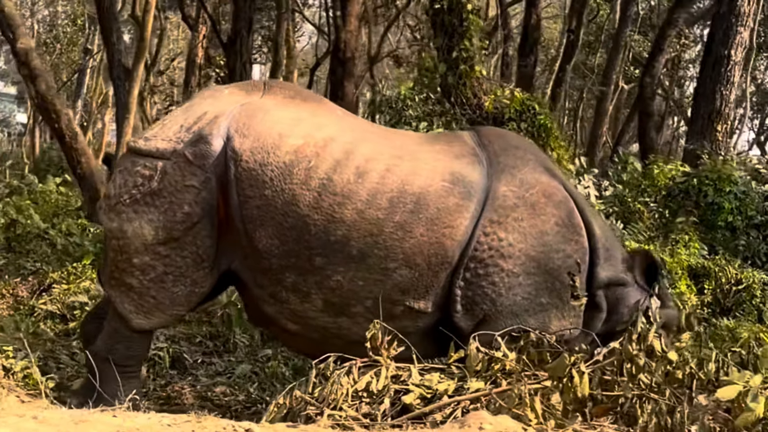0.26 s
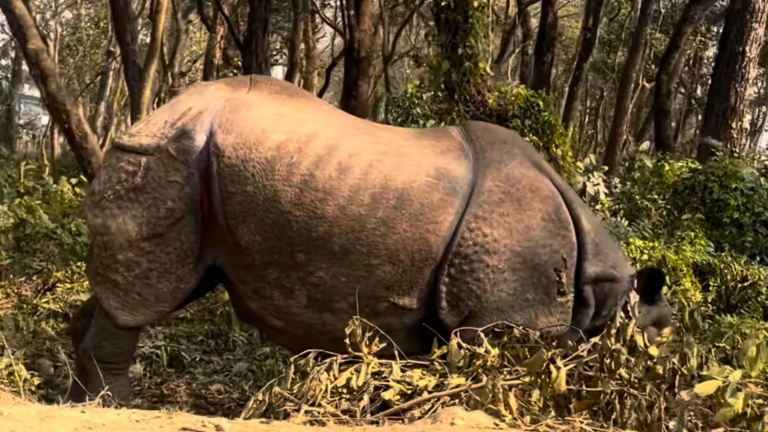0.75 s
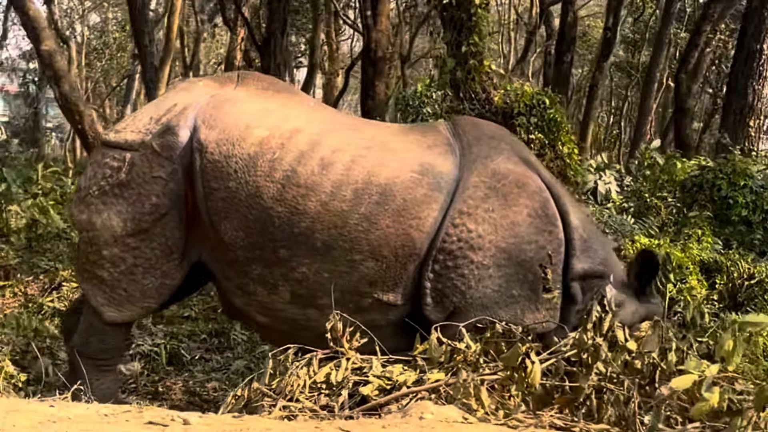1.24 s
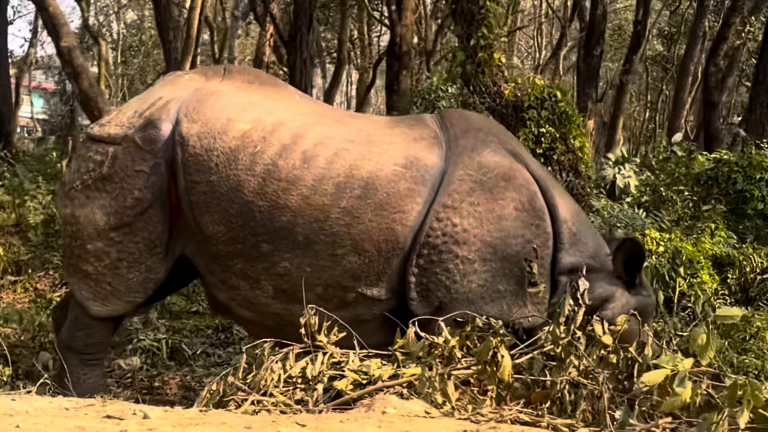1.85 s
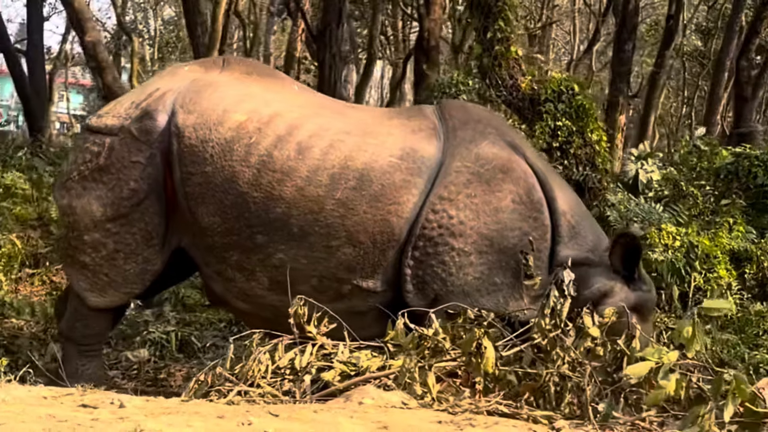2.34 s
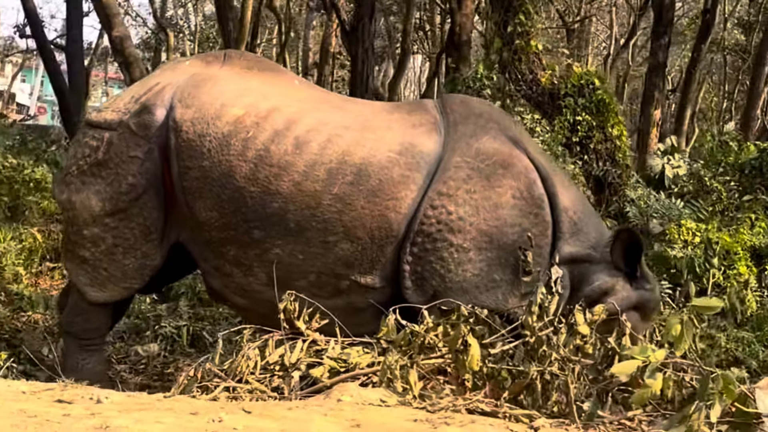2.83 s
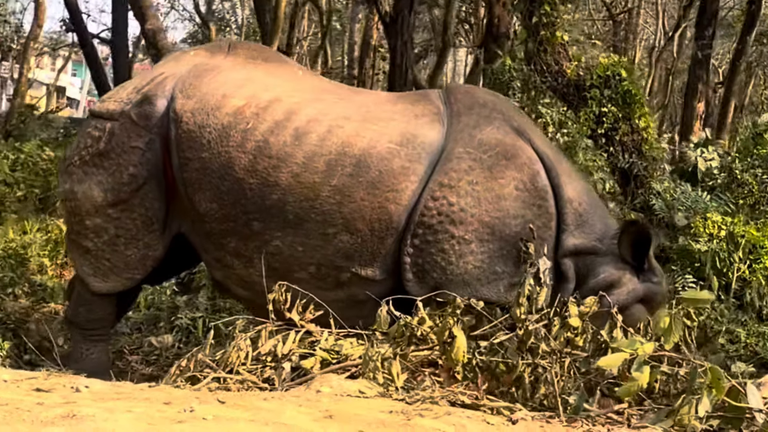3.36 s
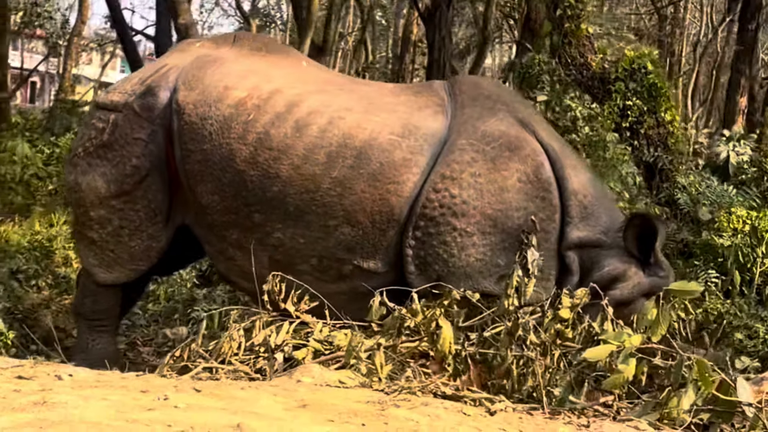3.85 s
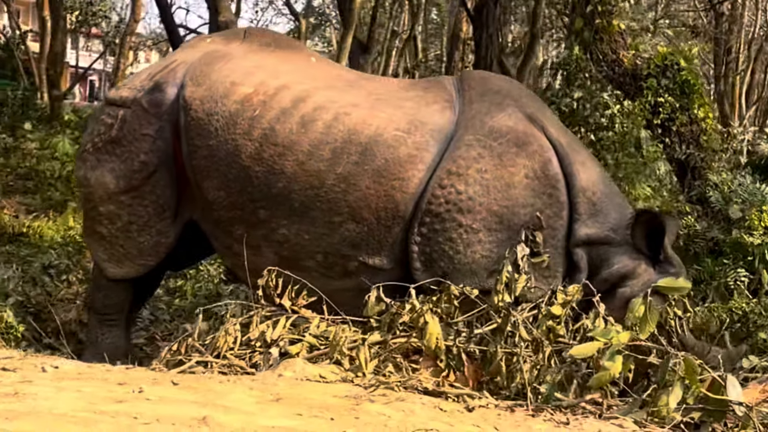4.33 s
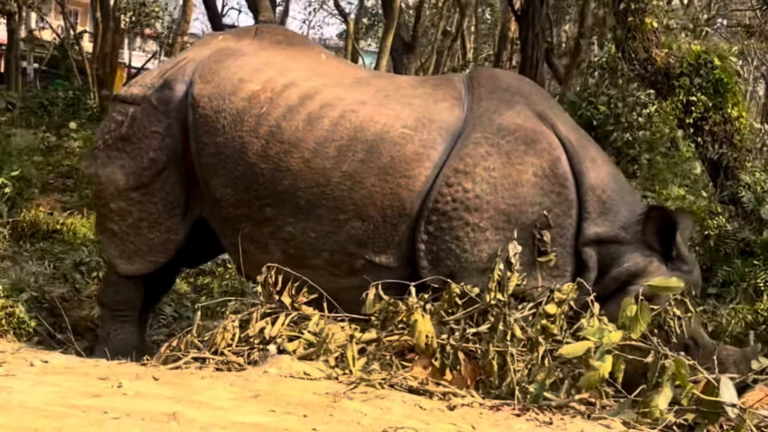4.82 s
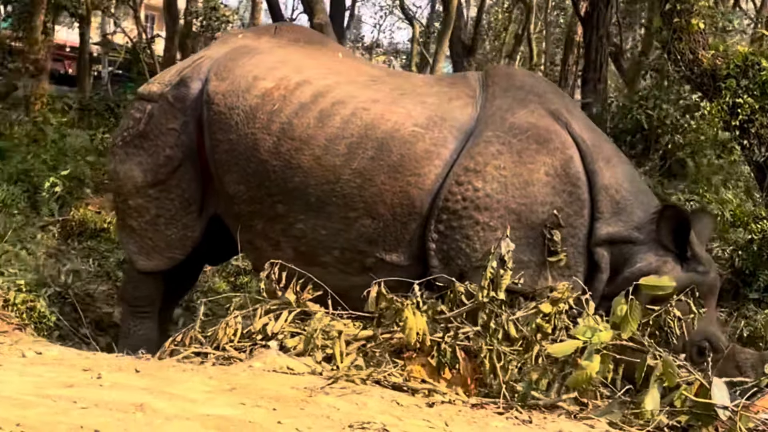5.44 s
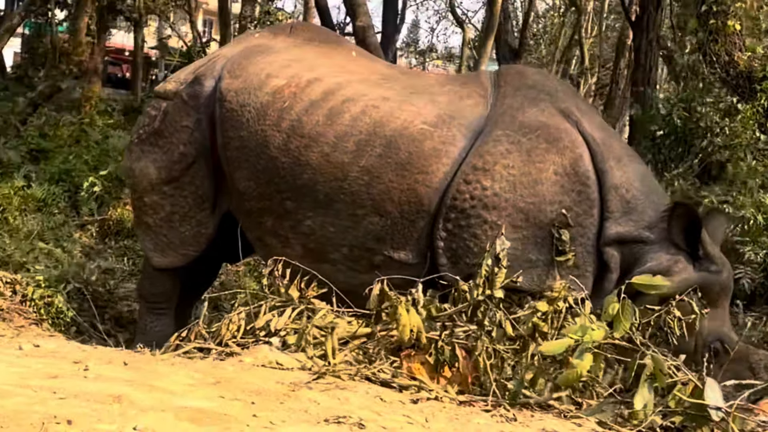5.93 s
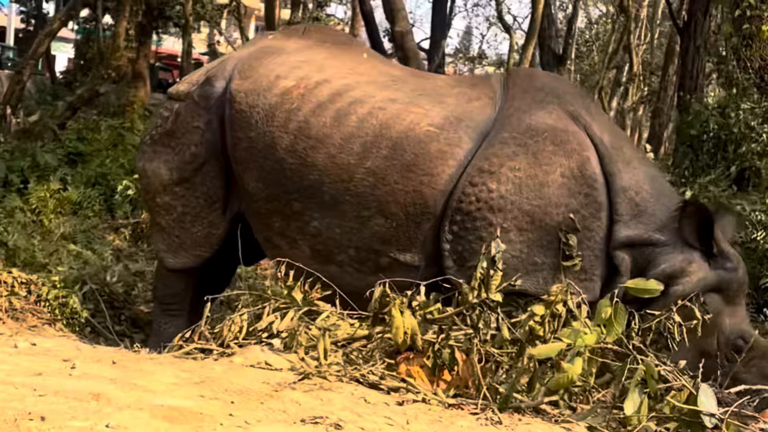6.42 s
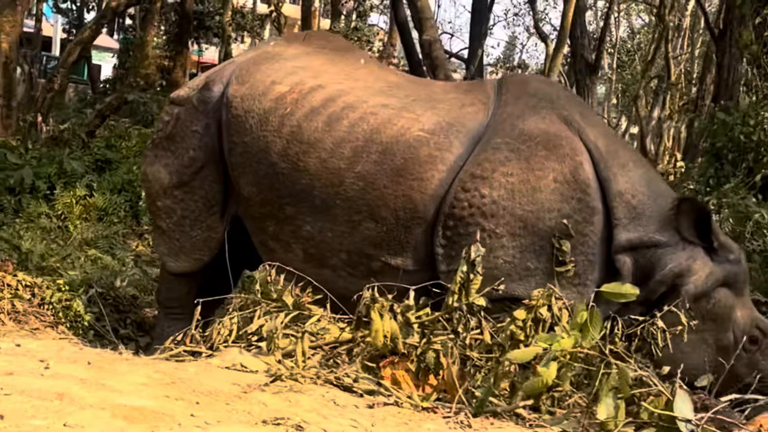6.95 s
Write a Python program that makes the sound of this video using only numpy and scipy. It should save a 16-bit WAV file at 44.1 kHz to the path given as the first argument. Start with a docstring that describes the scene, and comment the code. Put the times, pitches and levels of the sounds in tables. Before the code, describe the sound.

Birds chirp and warble on and off in a forest while a large animal browses with faint twig snaps, over a steady leafy hiss.

```python
"""A forest, with birds singing on and off near and far from a stereo pair of microphones. Their sliding,
warbling whistles are smeared by leaves and blurred by echoes from the trunks; a high buzz joins them.
A large animal browses in the brush, tearing off mouthfuls with small pops and snaps. Beneath lie
a steady hiss of leaves, a deep rumble and a faint low hum that swells twice."""
import sys
import numpy as np
from scipy import signal
from scipy.fft import rfft, irfft, next_fast_len
from scipy.io import wavfile
from scipy.ndimage import uniform_filter1d, map_coordinates

SR = 44100
rng = np.random.default_rng(int(sys.argv[2]) if len(sys.argv) > 2 else 0)


def wrap_up_sound(samples):
    """Save the sound to the file named by the first command line argument, as 16-bit audio."""
    columns = np.atleast_2d(samples).T
    # keep every value between -1 and 1, then stretch to whole-number steps
    tamed = np.clip(columns, -1, 1)
    steps = np.round(tamed * 32767).astype(np.int16)
    wavfile.write(sys.argv[1], SR, steps)


N = 316638
T = np.arange(N) / SR


def songbirds():
    """A far bird on the right warbles, plunges and rattles; a nearer one answers from the left."""
    # Notes of the song, its long fall into the low part, and the answer:
    # (time [s], length [s], from [Hz], to [Hz], relative level [dB], warble depth [Hz])
    song_notes = [(2.366, 0.015, 8150, 8080, -59.5, 100), (2.385, 0.024, 8670, 8960, -61, 180),
                  (2.408, 0.048, 8160, 8050, -52.5, 170), (2.445, 0.054, 7800, 7240, -49.5, 230),
                  (2.5, 0.078, 7150, 7520, -59, 720), (2.89, 0.047, 8650, 8300, -59, 20),
                  (2.95, 0.076, 7830, 7170, -51, 87), (3.025, 0.065, 6780, 6260, -56.5, 120),
                  (3.11, 0.11, 6930, 6910, -55.5, 100), (3.19, 0.13, 6950, 6800, -62.5, 160),
                  (3.115, 0.054, 6300, 6270, -64, 50), (3.375, 0.052, 3763, 4090, -50.5, 180),
                  (3.43, .06, 4010, 4045, -53, 140), (3.497, 0.072, 4090, 4084, -47.5, 75),
                  (3.575, 0.077, 4120, 4100, -53.5, 100), (3.64, 0.049, 3953, 3970, -46.5, 210),
                  (3.706, 0.03, 4070, 3900, -49, 150), (3.762, .012, 4120, 3900, -46, 110),
                  (3.8, 0.089, 3950, 3800, -55.5, 280), (3.545, .03, 3650, 3450, -58, 100),
                  (3.68, 0.046, 3700, 3570, -55, 200), (3.8, 0.078, 3450, 3400, -62, 90),
                  (3.875, .06, 3420, 3340, -60.5, 90), (3.95, .06, 3400, 3334, -63, 90),
                  (3.9, .06, 3900, 3810, -64, 200), (3.48, 0.11, 4345, 4800, -52, 210),
                  (6.44, 0.48, 3925, 3905, -56.5, 590)]
    plunge_notes = [(3.322, .064, 6690, 3640, -50, 160)]
    answer_notes = [(6.978, .018, 6190, 7270, -44.5, 16), (6.993, 0.066, 7310, 7160, -45.5, 460),
                    (7.145, 0.038, 6100, 6560, -46, 22), (7.15, 0.024, 5860, 5340, -54.5, 20)]
    song = rattle() + warbles(song_notes, rate=100, settle=3.51, crest=0.38, fade_db=7.5)
    song += warbles(plunge_notes, rate=130, settle=1.2, crest=0.92, fade_db=1.5)
    far = in_forest(amp(-5) * song, pan_db=-4.5, lag_s=0.000855, leaf_db=4, echo_db=7)
    answer = warbles(answer_notes, rate=110, settle=2.8, crest=0.4, fade_db=6)
    return far + in_forest(answer, pan_db=6.5, lag_s=-0.001, leaf_db=1, echo_db=-1.5)


def rattle():
    """The far songbird's fading run of quick beats, each a falling sweep."""
    start_s, length_s, beats_per_s = 3.546, 0.34, 35.6
    top_hz, bottom_hz, fade_db_per_s = 5200, 3450, 30
    since = T - start_s
    beat = since * beats_per_s % 1
    sweep = tone(top_hz + (bottom_hz - top_hz) * np.minimum(beat / 0.7, 1) ** 0.75)
    pulse = np.sin(0.999 * np.pi * np.minimum(beat / 0.75, 1) ** 1.2) ** 0.55
    gate = np.clip(np.minimum(since / 0.003, (length_s - since) / 0.054), 0, 1)
    return gate * amp(-47.5 - fade_db_per_s * np.abs(since) + 2.5 * wobble(36)) * pulse * sweep


def chatterers():
    """Two birds chatter in short chips, one far off to the right, one close on the left."""
    # Chips: (time [s], length [s], from [Hz], to [Hz], relative level [dB])
    far_chips = [(2.724, 0.025, 4460, 4450, -58), (2.747, .022, 3900, 4000, -54),
                 (2.757, .04, 5010, 5070, -58.5), (2.773, 0.012, 4200, 4000, -51),
                 (2.795, 0.023, 4120, 3980, -52.5), (2.796, .011, 3560, 3320, -51.5),
                 (2.823, .01, 4220, 3880, -54), (2.865, 0.013, 4260, 4010, -60),
                 (2.89, .03, 4270, 3930, -63), (6.575, 0.024, 3620, 4170, -63),
                 (6.612, 0.014, 4490, 3940, -51), (6.685, .02, 3600, 4250, -58),
                 (6.72, 0.019, 4600, 4000, -57.5), (6.8, 0.047, 5000, 4560, -62),
                 (6.85, 0.038, 4150, 3880, -62)]
    near_chips = [(6.354, 0.011, 4500, 4600, -43), (6.376, .016, 4190, 3945, -42),
                  (6.386, 0.012, 4900, 4760, -44), (6.402, 0.019, 4130, 3820, -36),
                  (6.421, 0.011, 3850, 2950, -43.5), (6.488, 0.018, 2990, 3030, -46),
                  (6.59, .045, 2980, 3010, -56), (6.66, .05, 3066, 2930, -61),
                  (6.522, .01, 4950, 4270, -44), (6.633, 0.028, 3610, 3580, -50),
                  (6.805, 0.066, 4510, 4740, -56), (6.445, 0.016, 3940, 3980, -51),
                  (6.466, 0.013, 2914, 2985, -46.5), (6.47, 0.024, 4000, 3970, -49),
                  (6.48, 0.014, 4830, 4870, -51), (6.48, .014, 3190, 3470, -46.5),
                  (6.492, 0.015, 3500, 3880, -33), (6.505, 0.0078, 3960, 3520, -42),
                  (6.531, 0.02, 4176, 3670, -33.5), (6.535, 0.033, 2994, 2997, -51.5),
                  (6.612, 0.013, 4110, 3920, -41), (6.624, .012, 3900, 3750, -35),
                  (6.666, 0.018, 4870, 4910, -46.5), (6.678, 0.011, 3960, 4000, -46),
                  (6.655, .015, 4050, 3980, -49), (6.7, 0.029, 3510, 3610, -55),
                  (6.78, .03, 3930, 3700, -56), (6.77, .022, 3040, 3050, -56),
                  (6.865, .014, 4190, 4070, -51), (6.69, 0.022, 4860, 4880, -52),
                  (6.72, .035, 4165, 4170, -47.5), (6.74, 0.041, 3740, 3030, -48),
                  (6.752, .035, 4850, 4920, -55), (6.825, 0.046, 4180, 4120, -48.5),
                  (6.93, 0.017, 4090, 4150, -55)]
    call = whistles(far_chips, amp(3.3 * wobble(150)), settle=1.3, crest=0.42, fade_db=5)
    far = in_forest(call, pan_db=-8, lag_s=0.0012, leaf_db=-6, echo_db=-1)
    call = whistles(near_chips, amp(1.6 * wobble(150)), settle=1.51, crest=0.53, fade_db=5)
    return far + in_forest(call, pan_db=4, lag_s=-0.000786, leaf_db=-10.5, echo_db=-3.5)


def piper():
    """A thin, clear caller left of centre pipes low and high in turn."""
    # Pipes: (time [s], length [s], from [Hz], to [Hz], relative level [dB])
    pipes = [(5.035, .11, 4260, 4400, -58), (5.386, 0.13, 6050, 5200, -59),
             (5.738, 0.082, 4460, 4370, -54.5), (6.073, 0.093, 5870, 5250, -56.5),
             (6.15, 0.04, 3600, 3620, -60)]
    # A falling tail to each high pipe: (time [s], relative level [dB])
    drops = [(5.425, -57), (6.113, -50)]
    drop_s, from_hz, to_hz = 0.036, 5300, 3640
    tails = [(s, drop_s, from_hz, to_hz, db) for s, db in drops]
    call = whistles(pipes, 0.64, settle=14, crest=0.3, fade_db=1.5)
    call += whistles(tails, 0.94, settle=2.1, crest=0.6, fade_db=4.5)
    return in_forest(call * amp(3.5 * wobble(70)), pan_db=5, lag_s=0.0004, leaf_db=-1.5, echo_db=-10)


def whistler():
    """A bird perched well to the left slurs low whistles."""
    # Slurs: (time [s], length [s], from [Hz], to [Hz], relative level [dB], arch above the slide [Hz])
    slurs = [(5.185, 0.052, 3800, 4380, -68, 8), (5.852, 0.041, 4860, 4580, -63, 10),
             (2.525, .04, 3000, 3710, -61.5, 10), (5.775, 0.035, 2380, 2330, -61, 24),
             (5.865, 0.051, 2260, 2418, -56.5, 132), (6.0, 0.06, 2275, 2210, -62.5, 8.1),
             (6.105, 0.085, 2283, 2620, -61, -41), (6.185, 0.063, 2580, 2990, -54, 71),
             (6.24, 0.029, 2990, 2715, -50.5, 46), (6.275, .022, 2820, 2590, -60, 10),
             (6.445, 0.027, 2550, 2514, -60.5, 14), (6.862, 0.044, 2600, 3240, -55.5, 39),
             (6.912, .022, 3410, 3450, -61, 30), (6.95, .05, 3400, 3380, -63, 10),
             (6.938, 0.04, 3120, 2770, -54, 20), (7.133, 0.04, 2720, 2600, -60, 10)]
    call = whistles(slurs, amp(1.3 * wobble(90)), settle=1, crest=0.62, fade_db=5)
    return in_forest(call, pan_db=12, lag_s=-0.0004, leaf_db=-4, echo_db=-3)


def triller():
    """A bird on the left slides up and trills near one pitch, its loudness pulsing fast."""
    # Trill notes: (time [s], length [s], from [Hz], to [Hz], relative level [dB])
    trill = [(4.698, 0.028, 2815, 3540, -61.5), (4.72, 0.098, 3550, 3560, -58.5),
             (4.83, .13, 3510, 3420, -60), (4.97, .08, 3500, 3480, -67)]
    flutter = 1 + 0.5 * np.sin(2 * np.pi * 54 * T + 0.3)
    call = whistles(trill, flutter, settle=1.1, crest=0.3, fade_db=2)
    return in_forest(call, pan_db=7, lag_s=-0.00057, leaf_db=-13.5, echo_db=-7)


def warbles(rows, rate, settle, crest, fade_db):
    """Notes whose pitch shakes unevenly about rate times a second."""
    song, shake = np.zeros(N), np.sin(2 * np.pi * rate * T + 2.69 * wobble(40))
    for span, _, hz, gain, (depth_hz,) in notes(rows, settle, crest, fade_db, edge_s=0.0032):
        song[span] += gain * tone(hz + depth_hz * shake[span])
    return song * amp(3.04 * wobble(90))


def whistles(rows, flutter, settle, crest, fade_db):
    """Sliding notes with a slight tremor in pitch; flutter scales their loudness."""
    out, tremor = np.zeros(N), 1 + 0.0066 * wobble(160)
    for span, progress, hz, gain, arch_hz in notes(rows, settle, crest, fade_db, edge_s=0.00086):
        arch = sum(arch_hz) * np.sin(np.pi * progress)  # zero for rows without an arch
        out[span] += gain * tone((hz + arch) * tremor[span])
    return out * flutter


def notes(rows, settle, crest, fade_db, edge_s):
    """Each note's samples, progress 0-1, pitch, gain and further columns. With settle above 1 the slide
    slows as it lands; the level peaks at the share crest of the length and falls fade_db to each end."""
    for s, length, from_hz, to_hz, db, *more in rows:
        span = slice(round(s * SR), min(round((s + length) * SR), N))
        progress = np.clip((T[span] - s) / length, 0, 1)
        hz = to_hz + (from_hz - to_hz) * (1 - progress) ** settle
        off_crest = np.where(progress < crest, 1 - progress / crest, (progress - crest) / (1 - crest))
        ramps = np.minimum(np.minimum(progress, 1 - progress) * length / edge_s, 1)
        yield span, progress, hz, amp(db - fade_db * off_crest) * ramps, more


def in_forest(call, pan_db, lag_s, leaf_db, echo_db):
    """A call reaches the left microphone lag_s after the right and pan_db louder; near leaves smear it,
    and the trunks scatter it into a long tail."""
    # Echoes from the trunks: (frequency [Hz], time to fall 60 dB [s])
    trunks = [(2000, 0.94), (4000, 0.95), (7000, 1.12), (9000, 0.21)]
    leaf_smear = amp(leaf_db) * dying_noise(lambda hz: np.full_like(hz, 0.15))
    trunk_tail = amp(echo_db) * dying_noise(lambda hz: along(trunks, hz))
    sides = np.array([[1], [-1]])
    direct = filtered(call, lambda hz: np.exp(-1j * np.pi * hz * lag_s * sides))
    echoes = signal.fftconvolve(call[None], leaf_smear + trunk_tail, axes=1)[:, :N]
    return amp(pan_db * sides / 2) * direct + amp(0.59 * pan_db * sides / 2) * echoes


def buzz():
    """A high insect-like buzz on the left: its pitch shakes fast across a narrow band and slowly sags."""
    # Course of the buzz: (time [s], pitch [Hz], relative level [dB])
    course = [(5.385, 8660, -73), (5.44, 8600, -60), (5.56, 8420, -64), (5.62, 8620, -60.5),
              (5.79, 8460, -57), (6.05, 8410, -61), (6.13, 8260, -67), (6.155, 8330, -48.5),
              (6.25, 8390, -53), (6.42, 8410, -66.5), (6.6, 8360, -77)]
    hz, db = curves(course)
    sounding = (T > course[0][0]) * (T < course[-1][0])
    pulses = sounding * amp(2.1 * wobble(130)) * tone(hz + 165 * wobble(400))
    return in_forest(amp(db - 6.5) * pulses, pan_db=6, lag_s=-0.0008, leaf_db=2.5, echo_db=3.5)


def browsing_animal():
    """Twigs pop and leaves tick in the brush, each a brief ring that dies sooner the higher it is."""
    # Dull twigs and crisp leaves: (time [s], peak level [dB], pitch [Hz], left over right [dB])
    twigs = [(0.289, -55, 3100, -9), (0.327, -55, 1375, -6), (0.682, -50.5, 2000, -4),
             (1.201, -49, 1090, 1), (1.28, -50, 634, 5), (1.438, -55, 1560, -5), (1.478, -53, 1084, 4),
             (1.517, -51, 1780, 0), (1.674, -53, 1080, -3), (1.737, -50, 554, -2), (1.835, -46.5, 1074, 7),
             (1.981, -53.5, 431, 4), (2.206, -50, 541, 1), (3.029, -50.5, 595, 5), (3.195, -49, 1310, -7),
             (3.279, -52, 714, -1), (3.806, -50, 1020, 3), (3.879, -49, 1174, 7), (4.183, -56, 1760, -6),
             (4.229, -48.5, 815, -1), (4.364, -51, 1295, -1), (4.562, -47.5, 553, 3),
             (4.798, -54.5, 1160, 5), (4.832, -51, 518, 3), (4.85, -52, 592, 9), (5.059, -52.5, 587, 5),
             (5.203, -51, 1063, -1), (5.711, -49.5, 997, -5), (5.777, -51.5, 1032, 2),
             (5.816, -50.5, 1044, -7), (6.007, -48.5, 903, -4), (6.634, -50.5, 1200, -1),
             (6.947, -53, 1050, 4)]
    leaves = [(1.035, -49, 6040, 3.0), (1.1493, -51, 6030, 5), (1.3152, -49, 4700, 0.5),
              (2.1829, -49, 4820, 3), (4.8658, -50, 5560, 1), (6.7944, -45, 4380, 3)]
    layers = (twigs, 0.032), (leaves, 0.008), (small_snaps(count=1400), 0.015), (crunches(count=9), 0.01)
    out, t = np.zeros((2, N + SR)), np.arange(SR // 28) / SR
    for events, base_t60 in layers:
        for s, db, hz, pan_db in events:
            envelope = amp(-60 * t / (base_t60 + 14 / hz)) * (1 - np.exp(-t * hz / 1.6))
            # fibres tear unevenly: the phase wanders, and differs between the microphones
            phase = np.cumsum(rng.normal(0, 0.014, len(t))) + rng.random() * np.array([[0.2], [-0.2]])
            pop = amp(db) * envelope / envelope.max() * np.sin(2 * np.pi * (hz * t + phase))
            start = round(s * SR)
            out[:, start:start + len(t)] += amp([[pan_db / 2], [-pan_db / 2]]) * pop
    return out[:, :N]


def crunches(count):
    """Rows like the twigs': each mouthful tears off in a cluster of count cracks."""
    # Mouthfuls: (time [s], length [s], middle level [dB], middle pitch [Hz])
    mouthfuls = [(.315, .04, -53.5, 693), (1.198, .045, -53.5, 1050), (1.26, .05, -60, 710),
                 (1.33, .035, -56.5, 850), (1.395, .02, -59.5, 580), (1.475, .05, -66, 1070),
                 (4.845, .025, -56, 617), (5.03, .045, -55.5, 820), (6.63, .03, -58.5, 1096)]
    spread_octaves = 0.333
    s, length, db, hz = np.repeat(mouthfuls, count, axis=0).T
    when = rng.random(len(s))
    size, pitch, side = rng.standard_normal((len(s), 3)).T
    return np.c_[s + length * when, db + 2.5 * size, hz * 2 ** (spread_octaves * pitch), 3 * side]


def small_snaps(count):
    """Rows like the twigs': faint snaps scattered by chance through the brush."""
    when, size, pitch, side = rng.random((count, 4)).T
    hz = 400 * 16 ** pitch
    db = -71 + 16 * size ** 3 - 2.2 * np.log2(hz / 400)  # few are strong, higher ones are weaker
    return np.c_[when * N / SR, db, hz, 24 * (side - 0.5)]


def hum():
    """A faint low tone swells and fades twice, first on the left, then near the centre."""
    # Swells: (time [s], length [s], from [Hz], to [Hz], level [dB], left over right [dB])
    swells = [(2.72, 0.99, 164.3, 170.6, -62.5, 22), (6.15, 0.38, 209.8, 200.3, -68.5, -2)]
    out = np.zeros((2, N))
    for span, _, hz, gain, (pan_db,) in notes(swells, settle=2.56, crest=0.36, fade_db=17, edge_s=0.055):
        out[:, span] += gain * tone(hz) * 2 / (1 + amp([[-pan_db], [pan_db]]))
    return out


def air():
    """Leaves hiss all round the microphones, with a far hiss from the left and a deep rumble."""
    # Noise spectra: (frequency [Hz], relative density [dB])
    leaf_spectrum = [(24, -21), (40, 4), (64, -2.5), (91, -9), (159, -13.5), (187, -12), (413, -11),
                     (1100, -8.5), (1490, -14.5), (3540, -15), (5790, -22.5), (8210, -29), (10600, -49),
                     (13800, -76), (22000, -120)]
    far_spectrum = [(200, -39.5), (400, 1), (1100, 2), (1500, -8), (3500, -4), (5500, -23), (8000, -45)]
    rumble_spectrum = [(2, -13), (3, -35), (4.5, 8), (8, -4.5), (15, -3.5), (27, -16), (40, -32), (70, -66)]
    # Rise and fall of the rumble: (time [s], level [dB])
    rumble_levels = [(0.0, -42.5), (0.24, -48.5), (3.9, -46.5), (4.76, -44.5), (5.68, -52.5), (6.4, -47),
                     (7.18, -56)]
    hiss = amp(-53.5 + 0.61 * wobble(5.3)) * rush(leaf_spectrum, patchy_db=1.65)
    far = amp(-64.5) * rush(far_spectrum, patchy_db=1.5)[0]
    far_pair = np.array([far, np.roll(far, 21)])  # reaches the right microphone 21 samples late
    rumble = amp(curves(rumble_levels)[0]) * rush(rumble_spectrum, patchy_db=-0.37)
    return hiss + far_pair + rumble


def rush(spectrum, patchy_db):
    """Stereo noise with patches of random gain, alike at the two microphones in the bass only."""
    # Likeness of left and right: (frequency [Hz], correlation [-1 to 1])
    likeness = [(60, 0.9), (120, 0.69), (260, 0.1), (540, 0.23), (1130, -0.14), (2350, -0.079),
                (4890, 0.092), (10200, -0.056)]

    def mid_side_gains(hz):
        angle = np.arccos(np.clip(along(likeness, hz), -1, 1)) / 2
        return amp(along(spectrum, hz)) * [np.cos(angle), np.sin(angle)]

    bins = signal.stft(rng.standard_normal((2, N)), nperseg=512)[2]
    patches = uniform_filter1d(rng.standard_normal(bins.shape[1:]), size=6, axis=0)  # across frequency
    patches = uniform_filter1d(patches, size=10, axis=1)  # across time
    pair = signal.istft(bins * amp(patchy_db * unit(patches)), nperseg=512)[1][:, :N]
    mid, side = filtered(pair, mid_side_gains)
    return unit(np.array([mid + side, mid - side]))


def dying_noise(t60):
    """Stereo noise of energy about 1 a side whose frequencies fall 60 dB in t60(Hz) seconds."""
    hz, t, bins = signal.stft(rng.standard_normal((2, 3 * SR // 2)), SR, nperseg=256)
    tail = signal.istft(bins * amp(-60 * t / t60(hz)[:, None]), SR, nperseg=256)[1]
    return tail / np.linalg.norm(tail[0])


def amp(db):
    """Gain of a level in dB."""
    return 10 ** (np.asarray(db) / 20)


def unit(x):
    """x at rms 1."""
    return x / np.sqrt(np.mean(x ** 2) + 1e-20)


def along(points, hz):
    """(frequency [Hz], value) points read on a log axis."""
    knots_hz, values = np.transpose(points)
    return np.interp(np.log(hz + 1), np.log(knots_hz + 1), values)


def curves(rows):
    """One value per sample for each column after the time."""
    times, *columns = np.transpose(rows)
    return [np.interp(T, times, column) for column in columns]


def wobble(rate):
    """A smooth random curve, rate knots a second."""
    return map_coordinates(rng.standard_normal(int(N * rate / SR) + 4), [T * rate])


def tone(hz):
    """A sine of rms 1 that follows a pitch curve."""
    return np.sqrt(2) * np.sin(2 * np.pi * np.cumsum(hz) / SR)


def filtered(x, response):
    """x with its spectrum multiplied by response(Hz)."""
    size = next_fast_len(N + SR // 2)
    return irfft(rfft(x, size) * response(np.fft.rfftfreq(size, 1 / SR)), size)[..., :N]


def scene():
    """Birds, brush and air as they meet at the microphones."""
    birds = songbirds() + chatterers() + piper() + whistler() + triller()
    return birds + buzz() + browsing_animal() + hum() + air()


def record(dry):
    """The recorder keeps nothing above its band limit."""
    top_hz = 10780
    return filtered(dry, lambda hz: hz < top_hz)


dry = scene()
out = record(dry)
wrap_up_sound(out)
```